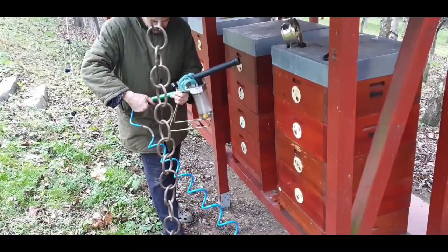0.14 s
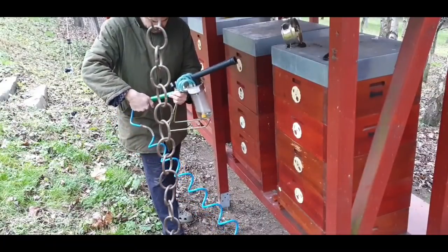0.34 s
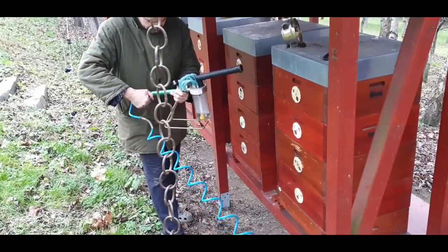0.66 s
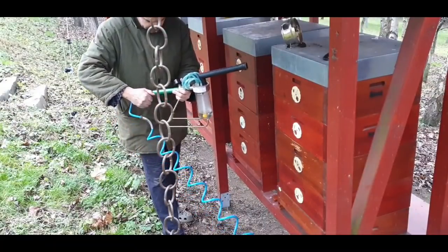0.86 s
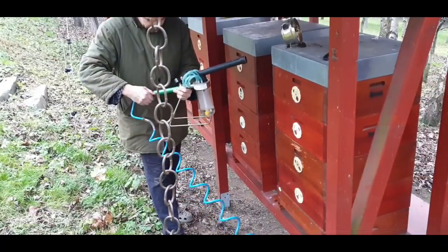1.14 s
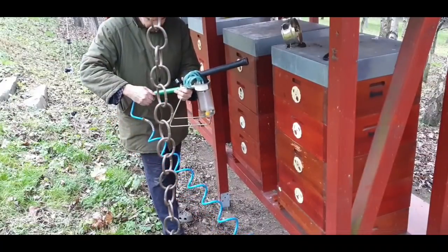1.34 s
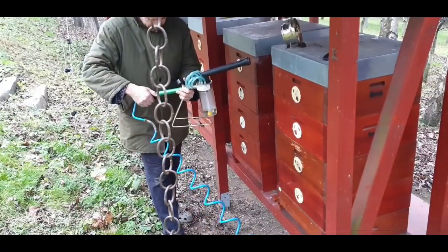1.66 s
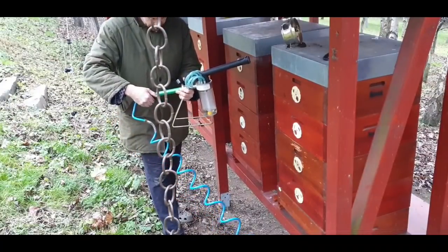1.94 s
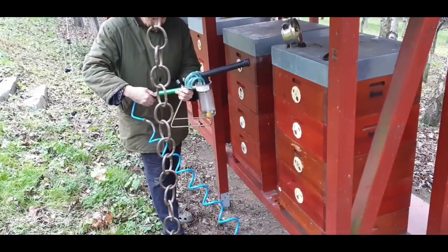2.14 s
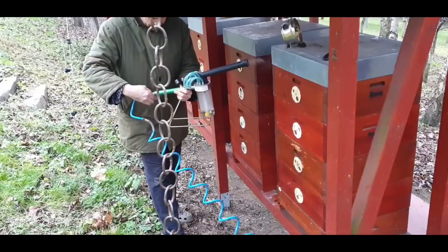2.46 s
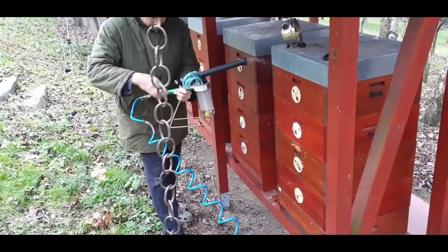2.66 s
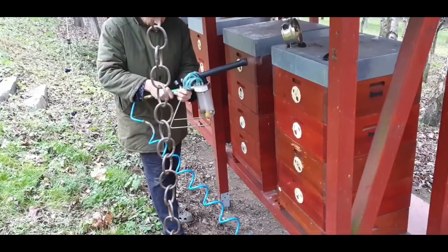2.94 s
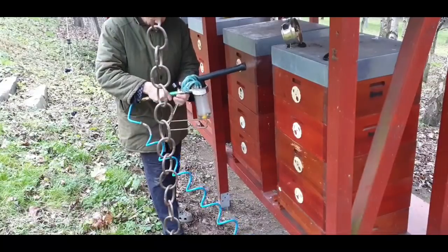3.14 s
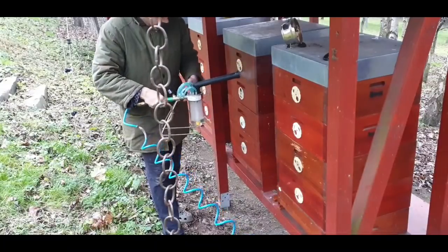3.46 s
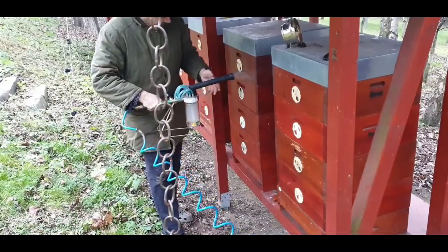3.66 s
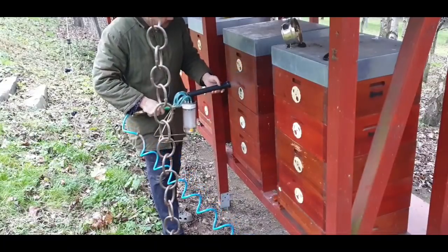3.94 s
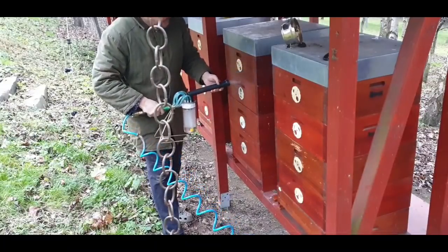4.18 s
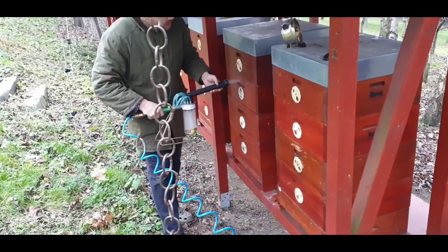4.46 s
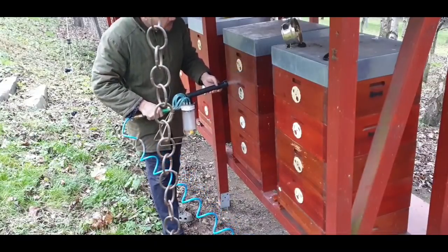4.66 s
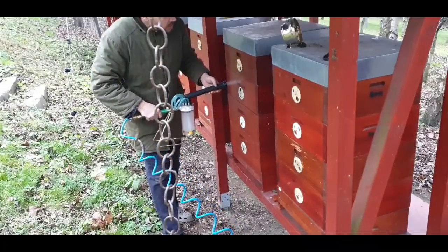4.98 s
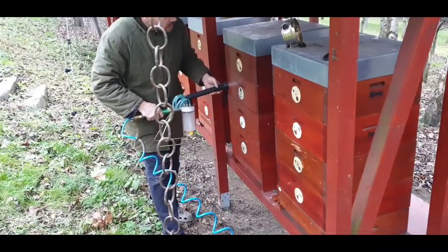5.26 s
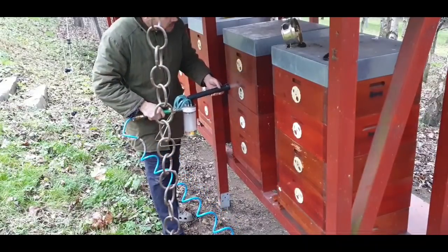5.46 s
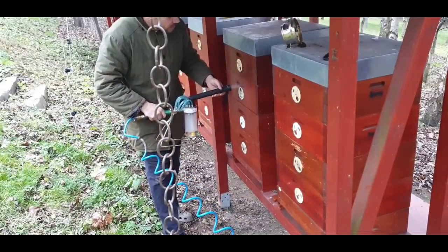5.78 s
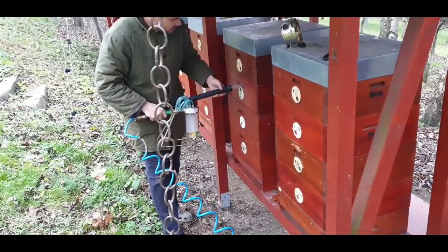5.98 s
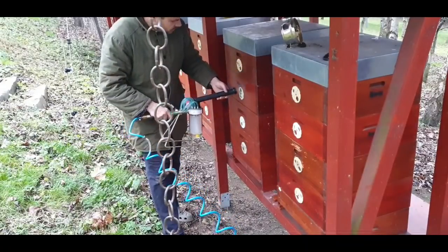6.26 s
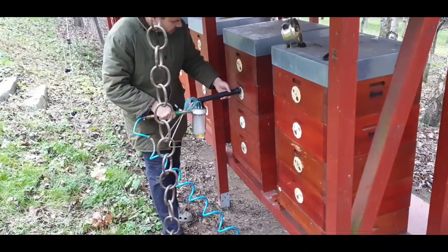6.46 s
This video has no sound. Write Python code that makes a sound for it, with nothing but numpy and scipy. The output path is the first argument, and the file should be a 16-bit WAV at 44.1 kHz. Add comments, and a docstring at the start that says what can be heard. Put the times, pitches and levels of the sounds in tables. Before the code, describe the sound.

A low, wavering hum and soft rumbling air fill the first moment, with three barely audible clicks. Just before one second compressed air bursts out as a steady, sizzling treble hiss with thin whistling tones inside. It gradually sinks, then drops to a faint, breathy spray against the wooden entrance, briefly lifting near the end. Small outdoor stereo device, dry, no echo.

```python
"""Mist sprayer at a hive

A compressed-air mist sprayer is opened outdoors: its jet, noise coloured by tube modes, hisses into free air,
then weaker against the entrance of a wooden hive. A distant compressor, wavering tones, drones over a quiet
yard of low noise. The hand ticks on the valve, which whistles as it opens. Two microphone ports a little apart.
"""
import sys
import numpy as np
from scipy import signal
from scipy.io import wavfile
from scipy.ndimage import uniform_filter1d

SR = 44100
rng = np.random.default_rng(int(sys.argv[2]) if len(sys.argv) > 2 else 0)


def dump(signal):
    """Clip the signal to [-1, 1] and save it as 16-bit WAV at the path in sys.argv[1]."""
    limited = np.clip(np.atleast_2d(signal).T, -1, 1)
    pcm = np.round(limited * 32767).astype(np.int16)
    wavfile.write(sys.argv[1], SR, pcm)


def convert_level_to_amplitude(level_db):
    """Map a level in decibels to its linear amplitude factor."""
    exponent = np.asarray(level_db, float) / 20
    return 10 ** exponent


N = 291985
HZ = np.fft.rfftfreq(1024, 1 / SR)[:, None]
FRAME_S = np.arange(N // 256 + 5) * 256 / SR

# compressor strokes: start_s, stroke_hz, level_db (before the port gains)
DRONE = [(0.0, 53.8, -69.5), (0.16, 56.66, -48), (0.35, 52.4, -69.5), (0.5, 53.08, -51.5),
         (1.27, 52.44, -51.5), (1.45, 53.7, -53.5), (1.62, 55.1, -51.5), (1.73, 55.68, -58.5),
         (1.86, 55.63, -50), (1.93, 55.2, -57.5), (2.1, 56.03, -53), (2.3, 55.4, -50), (2.38, 55.1, -59),
         (2.46, 54.8, -52), (2.61, 56.27, -51), (2.71, 55.3, -61), (2.79, 56.9, -48), (2.87, 55.75, -55.5),
         (2.97, 55.2, -50.5), (3.08, 55.13, -58), (3.23, 56.5, -50), (3.32, 55.7, -52.5),
         (3.45, 54.95, -66), (3.59, 54.5, -53.5), (4.41, 54.5, -63), (4.52, 54.5, -53),
         (4.92, 54.46, -61.5), (5.33, 55.5, -50.5), (5.42, 55.3, -65.5), (5.73, 55.06, -55),
         (5.97, 58.6, -68), (6.05, 52.86, -62), (6.23, 53.7, -50.5), (6.38, 51.8, -65.5), (6.62, 52.7, -53)]
# jet: start_s, flow_db, lower_db (added once to the treble, twice well under 9 kHz)
JET = [(0.74, -84, -1), (0.82, -58, -8), (0.94, -53, -7.5), (0.975, -38.5, -9.5), (1.06, -40.5, -4),
       (1.15, -41.5, -2), (1.3, -35.5, -3.5), (1.5, -39, 0), (1.75, -38, 0), (2.6, -41.5, 0),
       (3.25, -45, 1), (3.45, -45, 0), (3.65, -52, 3.5), (4.64, -55.5, 4), (5.06, -53.5, 3),
       (6.0, -55.5, 5), (6.39, -48, 0.5), (6.62, -55, 4.5)]
# slide of the modes under 5.05 kHz while the nozzle is moved: start_s, pitch_factor
SLIDE = [(3.1, 1), (3.3, .93), (3.62, .85), (3.9, .92), (4.15, 1)]


def evened(x):
    """Scales to rms 1."""
    return x / np.sqrt(np.mean(abs(x) ** 2) + 1e-20)


def spectrum(points):
    """A spectrum table on the frequency bins, linear over log frequency."""
    hz, value = np.transpose(points)
    return np.interp(np.log(HZ + 1), np.log(hz + 1), value)


def curves(rows, t):
    """The columns of a curve table at times t."""
    s, *values = np.transpose(rows)
    return [np.interp(t, s, v) for v in values]


def drift(frames, size):
    """Slow chance of rms 1 along the last axis, at frame rate."""
    return evened(uniform_filter1d(uniform_filter1d(rng.standard_normal(size), frames), frames))


def patches(bins, frames):
    """Random field of rms 1 over frequency and time."""
    field = uniform_filter1d(rng.standard_normal((len(FRAME_S), len(HZ))), frames, 0)
    return evened(uniform_filter1d(field, bins, 1)).T


def peak(hz, width_hz):
    """Power of a steep resonance on the bins, top 1."""
    return 1 / (1 + (2 * (HZ - hz) / width_hz) ** 2) ** 2


def held(t, start_s, end_s, db, edge_s):
    """Gain that rises, holds and falls."""
    return convert_level_to_amplitude(db) * np.clip(np.minimum(t - start_s, end_s - t) / edge_s + .5, 0, 1)


def narrow(hz, width_hz):
    """Noise in a thin band around the curve hz: a wavering complex tone of rms 1."""
    r = np.exp(-np.pi * width_hz / SR)
    slow = rng.standard_normal(N) + 1j * rng.standard_normal(N)
    for _ in range(2):
        slow = signal.lfilter([1 - r], [1, -r], slow)
    return evened(slow) * np.exp(2j * np.pi * np.cumsum(hz * np.ones(N)) / SR)


def pair(level, alike, side_db, lag_s):
    """Noise at two ports: partly shared, unequal in level, the left one late; level 1 gives rms 1."""
    a, b, c, d = rng.standard_normal((len(FRAME_S), len(HZ), 4)).T
    alike = np.clip(alike, 0, 1)
    right = a + 1j * b
    late = right * np.exp(-2j * np.pi * HZ * lag_s)
    left = alike * late + np.sqrt(1 - alike ** 2) * (c + 1j * d)
    z = level * np.array([left * convert_level_to_amplitude(side_db / 2), right / convert_level_to_amplitude(side_db / 2)])
    return signal.istft(z, nperseg=1024, noverlap=768)[1][:, :N] * np.sqrt(3 / 1024)


def yard():
    """Low noise wash of the surroundings, swelling slowly, its bass lumpy and partly following the drone."""
    # wash before the swells and the roll-off at 4 kHz: hz, level_db_per_hz
    wash = [(40, -74.5), (90, -80), (130, -87.5), (170, -100), (210, -102), (260, -102), (450, -108),
            (900, -113), (1500, -116), (2500, -119)]
    # swell: start_s, bass_db, tilt_db (half is added well over 450 Hz, half taken off below)
    wash_swell = [(0, -5, -6), (.7, -2, -3.5), (1.2, -5.5, -5), (2., 1.5, 6), (3.2, -1, 3),
                  (4.2, -1.5, 7.5), (4.7, -9.5, -9), (5.4, -5.5, -0.5), (6.62, -2.5, 9.5)]
    # hz, left_right_likeness
    wash_alike = [(60, .93), (120, .75), (250, .5), (500, .3), (1200, .15), (15000, .02)]
    # hz, left_right_db
    wash_side = [(60, -4.4), (200, -3.5), (1000, -2), (4000, -1)]
    surge_share = 0.16

    bass_db, tilt_db = curves(wash_swell, FRAME_S)
    low = 1 / (1 + (HZ / 450) ** 3)
    drone_db = curves(DRONE, FRAME_S)[1]
    surge_db = surge_share * (drone_db - uniform_filter1d(drone_db, 80))
    lumps_db = 2.5 * drift(6, size=len(FRAME_S)) + surge_db
    level_db = spectrum(wash) + low * bass_db + (0.5 - low) * tilt_db
    level_db = level_db + lumps_db / (1 + (HZ / 240) ** 4) + 3 * patches(bins=4, frames=8)
    level = convert_level_to_amplitude(level_db) * np.sqrt(SR / 2) / (1 + (HZ / 4000) ** 4)
    return pair(level, spectrum(wash_alike), spectrum(wash_side), 0)


def compressor():
    """The stroke rate as a wavering tone, its octave and other hums, unsteady in another way at each port."""
    waver, waver_hz = 0.28, 4.2
    octave_db, octave_db_per_hz, usual_hz = -12, 2.5, 54.5  # the octave grows as load slows the strokes
    hum_hz, hum_db, hum_follows = 65.5, -62.5, 0.93  # shares most of the drone's swells
    passing_start_s, passing_end_s, passing_db, passing_hz = 2.2, 2.62, -69, 155.6

    t = np.arange(N) / SR
    hz, first_db = curves(DRONE, t)
    turn = np.exp(2j * np.pi * np.cumsum(hz) / SR)
    first = turn * evened(1 + waver * narrow(0, waver_hz))
    second = turn ** 2 * evened(1 + 0.36 * narrow(0, 9.8))
    hum = np.exp(2j * np.pi * hum_hz * t) * evened(1 + narrow(0, 3.7))
    octave_gain = convert_level_to_amplitude(octave_db + octave_db_per_hz * (usual_hz - hz))
    tones = convert_level_to_amplitude(first_db) * (first + octave_gain * second)
    tones += convert_level_to_amplitude(hum_db + hum_follows * (first_db - first_db.mean())) * hum
    tones += held(t, passing_start_s, passing_end_s, passing_db, edge_s=0.13) * narrow(passing_hz, 10.6)
    ports = np.array([tones * (1 + .2 * narrow(0, 6)) for _ in range(2)])
    return np.sqrt(2) * ports.real * convert_level_to_amplitude([[-2.6], [2.1]])


def valve():
    """Three faint ticks of rasping and ringing noise, then a short whistle of air in the half-open valve."""
    # hand on the valve: start_s, gain_db (before the rasp and ring weights), ring_hz
    ticks = [(0.138, -70, 7370), (0.453, -72, 7960), (0.707, -68, 7600)]
    start_s, end_s, hold_db = 0.805, 1.15, -81  # before the onset boost and the port gains
    whistle_hz, whistle_width_hz = 1160, 53

    t = np.arange(N) / SR
    tone = np.sin(2 * np.pi * whistle_hz * t) + narrow(whistle_hz, whistle_width_hz).real
    out = held(t, start_s, end_s, hold_db, edge_s=0.015) * evened(tone)
    out *= 1 + 1.2 * np.exp(-abs(t - start_s) / .05)  # firmest at its start
    u = t[:3000]
    for s, db, hz in ticks:
        sine = np.sin(2 * np.pi * hz * u)
        rasp = rng.standard_normal(len(u)) * (1 + 0.82 * sine)
        ring = signal.lfilter([.03], [1, -.97], rng.standard_normal(len(u))) * sine
        envelope = convert_level_to_amplitude(db - 60 * u / .22) * np.minimum(u / .005, 1)
        out[round(s * SR):][:len(u)] += envelope * (.5 * rasp + 3 * ring)
    return out * convert_level_to_amplitude([[-2.5], [2.5]])


def modes(table):
    """Power of tube modes over the turbulence; each wanders in pitch and strength. Scaled so the 9-15.5 kHz
    power, spread over all bins, averages 1 (about 3.4 within that band)."""
    # turbulence under the modes, before scaling: hz, relative_db_per_hz
    turbulence = [(500, -53), (900, -31), (1250, -38.5), (1700, -41.5), (2500, -27), (3500, -37.5),
                  (4500, -17.5), (6000, -14), (8000, -7.5), (9500, -5.5), (12000, -1.5), (15800, -1)]
    power, slide = convert_level_to_amplitude(2 * spectrum(turbulence)), curves(SLIDE, FRAME_S)[0]
    for hz, width_hz, db in table:
        stray, swell = drift(20, size=(2, len(FRAME_S)))
        centre_hz = hz * slide + 25 * stray if hz < 5050 else hz + 22 * stray
        swell_db = 1.5 * swell * min(250 / width_hz, 1)
        power = power + convert_level_to_amplitude(2 * db) * peak(centre_hz, width_hz) * convert_level_to_amplitude(2 * swell_db)
    return power / (power * ((HZ > 9000) & (HZ < 15500))).mean()


def jet():
    """Turbulent air coloured by the tube; nearing the wood changes colour and scatters the sound."""
    # tube modes with the nozzle free and at the entrance: hz, width_hz, relative_db
    free_modes, entrance_modes = [(3384, 103, -17), (3785, 26, -11), (4311, 23, -4.5), (4704, 100, -10),
                                  (4960, 77, -11.5), (5152, 39, 0.5), (5460, 120, -3), (5862, 110, -3),
                                  (6640, 64, -1.5), (7190, 130, -5)], [(3807, 185, -13.5), (4224, 260, -8), (4595, 110, -5.5),
                                                (5040, 130, -7), (4870, 47, -11.5), (5400, 199, -5),
                                                (5910, 42, -4), (6550, 530, -7), (7630, 120, -1.5)]
    # broad treble humps of the nozzle mouth, free and at the entrance: hz, width_hz, relative_db
    free_mouth, entrance_mouth = [(7730, 178, -0.5), (9370, 290, -4.5), (10300, 310, 2), (11380, 220, 3.5),
                                  (12620, 170, 3.5), (13300, 900, -1.5), (15200, 310, -5.5)], [(10250, 880, -2.2), (11250, 500, 2.1),
                                                      (12630, 900, 1.8), (13750, 360, 0.67),
                                                      (14800, 860, 0.29)]
    # gaps between modes: hz, width_hz, free_db, entrance_db (mean depths; they fill and deepen)
    gaps = [(3560, 130, -4, -8), (2880, 200, -7, -5), (4050, 90, -5, -3), (4530, 150, -11, -11),
            (4990, 110, -8, -2), (5680, 120, -7, -5), (6240, 240, -22, -8), (12050, 300, -3, -4)]
    # hz, left_right_db, free and at the entrance
    free_side, entrance_side = [(2500, -7), (3000, -2), (3450, 7), (3900, 4), (4300, 5), (4800, -1.5),
                                (5500, -3.5), (6500, -2.5), (7700, -7), (8900, -3.5), (10200, -7.5),
                                (11400, -5.5), (12800, 0), (15800, 0)], [(2500, 7), (3000, -4), (3450, 0), (3900, -4),
                                                   (4300, -1.5), (5500, -1.5), (6500, -1), (7700, -6),
                                                   (8900, -5), (10200, -1), (11400, 2), (12800, 0),
                                                   (15800, 3)]
    # hz, factor on the left-right likeness
    alike_factor = [(2000, .4), (5000, .7), (8000, .7), (10500, 1.15), (15800, 1.15)]
    # nozzle: start_s, nearness (0 free, 1 at the entrance)
    nozzle = [(.9, .3), (1.5, 0), (2.3, 0), (2.75, .1), (3.5, .15), (3.9, 1), (5.4, 1), (5.8, .85),
              (6.62, .8)]
    # lower tones: start_s, lowest_hz, lowest_db, lift_db (under 4.9 kHz), under_db (further, under 4.05 kHz)
    tube_load = [(.92, 2420, -100, 7, 1), (1.03, 2400, -90, 9.5, 5), (1.15, 2520, -96, 7.5, -4.5),
                 (1.3, 2370, -112, 4.5, -11), (1.45, 2342, -80, -1, -6.5), (1.62, 2323, -93, -8, -3.5),
                 (1.78, 2400, -82, -6, -3), (1.95, 2322, -84, -5.5, -7), (2.06, 2355, -80, -7, -6),
                 (2.2, 2450, -83, -4, -1), (2.4, 2334, -79, -1.5, -5.5), (2.5, 2358, -69.5, 5.5, -8),
                 (2.66, 2380, -80, 5.5, -2.5), (2.82, 2362, -74, 3.5, -4.5), (2.99, 2345, -68, 8, -4),
                 (3.14, 2360, -77, 2, 4), (3.24, 2566, -76.5, -9, 6), (3.43, 2628, -62.5, 5.5, -4),
                 (3.5, 2664, -81, -5, 7), (3.7, 2400, -99, 8.5, -20.5), (3.88, 2405, -76, -6, 6),
                 (4.15, 2415, -81.5, -9.5, 8), (4.35, 2416, -79, -2, 6), (4.6, 2537, -77.5, -2, -1),
                 (4.76, 2486, -86, 4.5, -5), (4.92, 2467, -81.5, 3, 1.5), (5.36, 2475, -85, 5.5, -8),
                 (5.46, 2553, -82, -4.5, 5.5), (5.82, 2520, -86, -4, -4), (5.95, 2560, -73.5, -5.5, 0),
                 (6.1, 2538, -77, -13, 12), (6.2, 2570, -90, -12.5, 13), (6.4, 2545, -71.5, -1, 6.5),
                 (6.62, 2515, -82, -12, 5)]
    # start_s, share of the lowest mode that is a thin tone, the rest a broad hump
    thin_share = [(1, .2), (1.25, 0), (1.98, 0), (2.06, .6), (2.15, 0), (2.38, .1), (2.47, .9), (3.45, .9),
                  (3.7, .2), (4.5, .55), (5.5, .45), (6.62, .4)]
    # treble over 14.3 kHz: start_s, lift_db
    topmost = [(.9, -2), (1.15, -6), (1.5, 1), (2.2, 0.5), (2.7, 1.5), (3.3, 1.5), (3.6, -0.5), (4.2, 0.5),
               (6.62, -0.5)]
    free_lag_us, entrance_lag_us, free_alike, entrance_alike = 58, 24, .65, .2  # left port is late
    lowest_width_hz = 60
    hollow_start_s, hollow_end_s, hollow_hz, hollow_width_hz, hollow_db = 1.63, 2.04, 4780, 460, -17
    second_start_s, second_end_s, second_db, second_hz = 3, 4, -80, 2170  # a second low tone

    flow_db, lower_db = curves(JET, FRAME_S)
    near = np.clip(curves(nozzle, FRAME_S)[0], 0, 1)
    lag_us = free_lag_us + near * (entrance_lag_us - free_lag_us)
    alike = free_alike + near * (entrance_alike - free_alike)
    lowest_hz, lowest_db, lift_db, under_db = curves(tube_load, FRAME_S)
    slide, thin = curves(SLIDE, FRAME_S)[0], curves(thin_share, FRAME_S)[0]

    power = (1 - near) * modes(free_modes + free_mouth) + near * modes(entrance_modes + entrance_mouth)
    for hz, width_hz, free_db, entrance_db in gaps:
        stray, fill = drift(12, size=(2, len(FRAME_S)))
        depth_db = (free_db + near * (entrance_db - free_db)) * np.clip(1 + .6 * fill, 0, 2)
        centre_hz = hz * (slide + .009 * stray if hz < 5050 else 1 + .0035 * stray)
        power = power * convert_level_to_amplitude(2 * depth_db * peak(centre_hz, width_hz))

    upper, lower = 1 / (1 + (9000 / (HZ + 1)) ** 8), 1 / (1 + (HZ / 4900) ** 14)
    power = power * convert_level_to_amplitude(2 * curves(topmost, FRAME_S)[0] / (1 + (14300 / (HZ + 1)) ** 30))
    eddies = patches(bins=10, frames=14)  # stronger and weaker mixing
    wisps = patches(bins=3, frames=16) / (1 + (HZ / 6500) ** 6)  # thin tones flare in the tube and die
    flutter = drift(3, size=len(FRAME_S))  # the mist spits: all bands flicker together
    colour_db = flow_db + (2 - upper) * lower_db + lower * lift_db + under_db / (1 + (HZ / 4050) ** 24)
    power = power * convert_level_to_amplitude(2 * colour_db)
    power = power * convert_level_to_amplitude(2 * ((0.8 + .8 * lower) * eddies + 3.5 * wisps + 0.5 * flutter))
    hollow = held(FRAME_S, hollow_start_s, hollow_end_s, 0, edge_s=.05)  # the hiss thins out in one band
    power = power * convert_level_to_amplitude(2 * hollow_db * peak(hollow_hz, hollow_width_hz) * hollow)

    lowest = peak(lowest_hz * (1 + .008 * drift(10, size=len(FRAME_S))), lowest_width_hz)
    skirt, second = peak(lowest_hz, 700), peak(second_hz, 130)
    power += convert_level_to_amplitude(2 * lowest_db) * (thin * lowest / lowest.mean(0) + (1 - thin) * skirt / skirt.mean(0))
    second_gain = held(FRAME_S, second_start_s, second_end_s, second_db, edge_s=0.038)
    power += second_gain ** 2 * second / second.mean()

    level = np.sqrt(power) * np.clip((FRAME_S - JET[0][0]) / 0.04, 0, 1)
    side_db = (1 - near) * spectrum(free_side) + near * spectrum(entrance_side)
    return pair(level, alike * spectrum(alike_factor), side_db, lag_us * 1e-6)


def dips(x):
    """While the jet runs, the midrange drops out for moments, often at both ports; the lowest mode is cut less."""
    z = signal.stft(x, nperseg=1024, noverlap=768)[2]
    t = FRAME_S[:z.shape[2]]
    middle = 1 / (1 + (250 / (HZ + 1)) ** 6) / (1 + (HZ / 3500) ** 10)
    middle = middle * (1 - .7 * peak(2500, 500))
    both, left, right = drift(3, size=(3, len(t))) + .6 * drift(8, size=(3, len(t)))
    chance = .8 * both + .6 * np.array([left, right])
    depth = .97 * np.clip(3 * (chance - .6), 0, 1) * (t > JET[0][0] + .2)
    return signal.istft(z * (1 - middle * depth[:, None]), nperseg=1024, noverlap=768)[1][:, :N]


def port_hiss():
    """Self-noise of the two ports, unshared."""
    # hz, level_db_per_hz
    hiss = [(300, -125), (2500, -124), (3800, -121), (5500, -121.5), (7000, -122), (8500, -131),
            (10500, -120), (15800, -119)]
    # hz, left_right_db
    hiss_side = [(300, -2), (6500, -2.5), (7400, -7), (9000, -6.5), (10000, -1), (15800, 0)]
    return pair(convert_level_to_amplitude(spectrum(hiss)) * np.sqrt(SR / 2), 0, spectrum(hiss_side), 0)


def scene():
    """All sources at the two ports."""
    return yard() + compressor() + valve() + jet()


def low_pass(x):
    """Removes everything above the highest recorded frequency."""
    return signal.sosfilt(signal.butter(12, 16720, fs=SR, output="sos"), x)


def record(dry):
    """Adds port hiss, then bass roll-off, midrange dips and band limit."""
    roll_off = signal.butter(3, 40, "high", fs=SR, output="sos")
    cut = signal.sosfilt(roll_off, dry + port_hiss())
    band_limit = signal.firwin(2047, 15740, window=("kaiser", 9), fs=SR)
    mix = signal.oaconvolve(dips(cut), band_limit[None], "same")
    return low_pass(mix)


dry = scene()
out = record(dry)
dump(out)
```